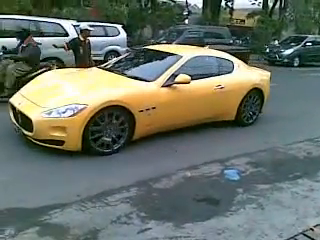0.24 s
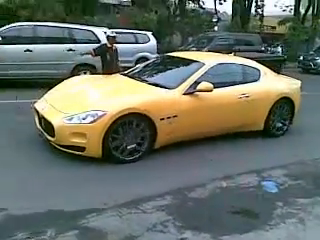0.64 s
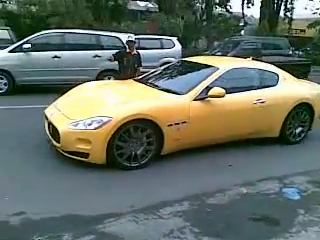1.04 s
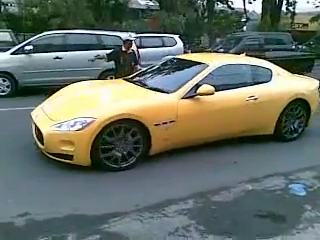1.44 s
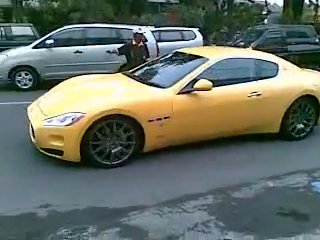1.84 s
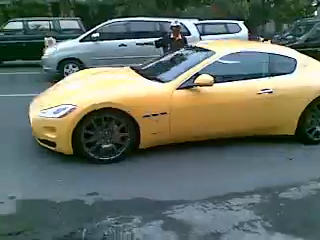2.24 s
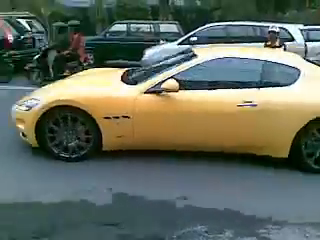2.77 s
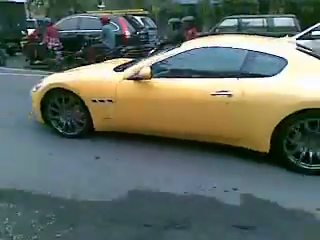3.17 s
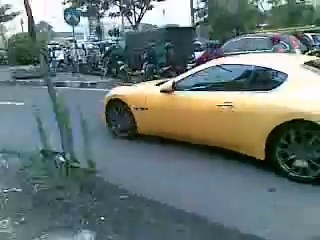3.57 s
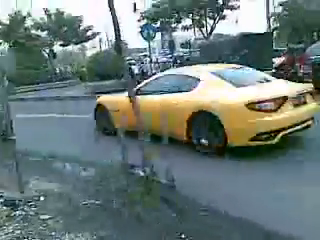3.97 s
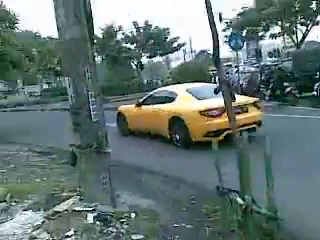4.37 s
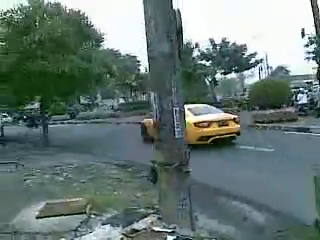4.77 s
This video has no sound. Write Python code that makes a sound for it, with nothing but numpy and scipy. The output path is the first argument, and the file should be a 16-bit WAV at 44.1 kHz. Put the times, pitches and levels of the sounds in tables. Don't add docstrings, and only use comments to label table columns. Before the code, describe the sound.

A city street heard from the kerb through a small camera microphone with thin, flickering treble. For the first two seconds, a soft low wash of traffic covers the faint, lumpy idle of an eight-cylinder car. A distant toot fades by 0.2 s, a tiny tick comes near 0.4 s, and a short rising toot at about 0.8 s. At 1.36 s a nearby two-tone horn gives one very brief, buzzing beep with a slight echo. Two short low hums follow around 2.1 s. From about 2.2 s the engine surges, its burble growing into bark and rasp, with soft tyre swishes over grit until about 3 s. Pitch climbs quickly, nearly levels around 3.3-3.8 s, then climbs again. Near 4.1 s the rasp swells with a sharp gritty swish as the tailpipes turn into view. The rear exhaust roars on, hissier after 4.7 s, still rising at the 5-second cut, echoed by house fronts.

```python
import sys
import numpy as np
from scipy import signal
from scipy.io import wavfile
from scipy.ndimage import uniform_filter1d

SR = 44100
rng = np.random.default_rng(int(sys.argv[2]) if len(sys.argv) > 2 else 0)


def gain_from_decibels(decibels):
    exponent = np.asarray(decibels, float) / 20
    return 10 ** exponent


def materialize(psi):
    bounded = np.clip(np.atleast_2d(psi).T, -1, 1)
    quanta = np.round(bounded * 32767).astype(np.int16)
    wavfile.write(sys.argv[1], SR, quanta)


N = 221861

# (time [s], firing rate [1/s])
SPEED = [(0, 55.6), (1.2, 56), (1.9, 55), (2, 66), (2.3, 104.8), (2.4, 110.5), (2.64, 134), (2.88, 167.2),
         (3.03, 176.6), (3.19, 189.4), (3.39, 196), (3.82, 198.2), (4.04, 213), (4.14, 225.9), (4.3, 246.8),
         (4.55, 277.3), (4.75, 313), (5.03, 356)]
# (time [s], level [dB])
EFFORT = [(0, -63), (.9, -66.5), (1.9, -68.5), (2.33, -50), (2.5, -40.5), (2.76, -42), (2.87, -33.5),
          (3, -34.5), (3.2, -32), (3.62, -29), (3.7, -33.5), (3.9, -32), (4.06, -28), (4.42, -28),
          (4.58, -28.5), (4.64, -28), (4.98, -24.5), (5.03, -25.5)]
# (time [s], share of rear view [0-1], roughness [0-1])
TURN = [
    (1.8, .02, .3),
    (2.3, .02, .2),
    (2.75, .02, .17),
    (3, .02, .12),
    (4.05, .1, .1),
    (4.4, .85, .13),
    (4.7, .98, .11),
    (5.03, .98, .13),
]
# (time [s], lateness [firing gaps])
FIRING_LAG = [(2.3, .25), (2.54, .72), (2.8, .2), (3.15, 0), (3.3, -.2), (3.45, -.2), (3.62, .05),
              (3.9, .2), (4.2, .25), (4.46, .5), (4.7, .4), (5.03, .3)]


def car():
    hz, effort_db, behind = curves(SPEED)[0], curves(EFFORT)[0], curves(TURN)[0]
    idle_db, full_db = -66, -41
    gas_db = np.clip(effort_db, idle_db, full_db) - full_db
    turns = np.cumsum(hz) / SR - curves(FIRING_LAG)[0]
    fire = firings(turns, behind)
    tones = low_tones(hz, gas_db, turns, fire)
    pipes = exhaust(effort_db, gas_db, behind, fire)
    return gain_from_decibels(3.5) * tones + hollowed(pipes) + gain_from_decibels(0.5) * gas_hiss(hz, behind, fire)


# (strength [dB], lateness [firing gaps])
SIDE_FIRINGS = [(.1, .024), (-5, .012), (-.3, .006), (3.2, .004), (3.2, .014), (-2.7, -.012), (.3, -.037),
                (1.6, -.011)]
# (strength [dB], lateness [firing gaps])
REAR_FIRINGS = [(1.6, -.061), (-.2, .226), (-1.6, -.126), (1, -.028), (2.6, -.067), (-.6, .214),
                (-.6, -.126), (.2, -.03)]
# (time [s], levels of the eight firings [dB])
CRACKS = [(2.45, [-12, 0, -14, -9, -14, 0, -14, -9]), (2.6, [-14, 0, -14, -10, -14, 0, -14, -10]),
          (2.72, [-2, -3, -5, -3, -1, 0, -1, 0]), (2.95, [-4, -9, -6, -2, -5, -9, -2, 0]),
          (3.4, [-5, -10, -7, -10, -10, -12, -2, 0]), (3.7, [-3, -7, -4, -10, -5, -10, -1, 0]),
          (3.97, [-2, -7, -7, -9, 0, -5, -2, -5]), (4.13, [-8, -12, -12, -10, -8, -6, -12, 0]),
          (4.35, [-9, -12, -12, -7, -10, -12, -12, 0]), (4.6, [-6, -9, -9, -2, -6, -9, -8, 0]),
          (4.9, [-1, -4, -5, 0, -3, -6, -6, -1])]


def firings(turns, behind):
    firing = np.arange(1, int(turns[-1]))
    beat = np.interp(firing, turns, np.arange(N))
    pattern_lag_s = .2
    rear = behind[np.maximum(beat - pattern_lag_s * SR, 0).astype(int)]
    rough = curves(TURN)[1][beat.astype(int)]
    side_view = np.array(SIDE_FIRINGS)[(firing - 3) % 8].T
    rear_view = np.array(REAR_FIRINGS)[(firing - 3) % 8].T
    strength_db, late = (1 - rear) * side_view + rear * rear_view
    spread, shake = rng.standard_normal((2000, 2))[:len(firing)].T
    spread_db = 8 * rough * spread
    wander = .03 * (1 - rear) * evened(uniform_filter1d(shake, size=10))
    at = np.interp(firing + late + .08 * rough * shake + wander, turns, np.arange(N))
    crack_s = [s for s, _ in CRACKS]
    by_cylinder = np.transpose([levels_db for _, levels_db in CRACKS])
    crack_db = np.array([np.interp(beat / SR, crack_s, levels_db) for levels_db in by_cylinder])
    return {"beat": beat, "at": at, "spread_db": spread_db, "shake": shake,
            "lumps_db": 3 * rough * uniform_filter1d(spread, size=2),
            "strength": gain_from_decibels(strength_db + spread_db), "crack_db": crack_db[firing % 8, firing - 1]}


# (time [s], lean of second harmonic over firing tone [dB], lope [0-1], boom [dB])
TONE_BALANCE = [(0, -0.3, 0.2, 1), (.9, -0.2, 0.1, 3), (1.2, -2.5, 0.05, -1), (1.9, -0.3, 0.05, 1),
                (2.2, 0.5, 0.44, 2.5), (2.36, -2, 0.17, -0.6), (2.44, -1.2, 0, -1.5), (2.55, 3.5, 0.17, -2),
                (2.72, 1, 0.4, 0), (2.85, 3, 0.12, 1.5), (3.02, 3.5, 0, 0.7), (3.3, 1, 0, 0.6), (3.6, 1.5, 0, 0.5),
                (3.9, -2, 0, 1), (4.1, -0.7, .03, -0.1), (4.5, 1.2, 0, 1.5), (4.7, 2.2, 0.02, 0),
                (5.03, -0.3, 0.06, -0.2)]


def low_tones(hz, gas_db, turns, fire):
    tones = np.zeros(N)
    for k, gain in zip((1, 2, 3, 1 / 4), low_levels(hz, gas_db)):
        fade = np.clip((500 - k * hz) / 80, 0, 1)
        tones += gain * fade * np.cos(k * (2 * np.pi * turns + 1))
    tones *= gain_from_decibels(np.interp(np.arange(N), fire["beat"], fire["lumps_db"]))
    lope = np.cos(np.pi * turns / 2 + 1) + np.cos(np.pi * turns)
    return tones * (1 + curves(TONE_BALANCE)[1] * lope)


ORDER_DB = [3, -2, -4]


def low_levels(hz, gas_db):
    t = np.arange(N) / SR
    lean_db, _, boom_db = curves(TONE_BALANCE)
    stumble_db = -13 * np.exp(-((t - 3.225) / 0.033) ** 2)
    shared_db = 0.64 * gas_db + boom_db + stumble_db
    crank = gain_from_decibels(shared_db - 66.5 + 23 * curves(TURN)[0] ** 2)
    levels = [low_pipe(k * hz) * gain_from_decibels(db + shared_db + lean * lean_db)
              for k, db, lean in zip((1, 2, 3), ORDER_DB, (-1, 1, 0))]
    return levels + [crank]


# (pitch [Hz], width [Hz], level [dB])
LOW_PIPE = [(58, 19, -31.5), (106.6, 24, -31.5), (179, 12, -28), (222, 78, -29.5), (258.6, 58, -31),
            (310, 55, -33), (331.2, 33, -30.5), (384, 73, -39), (473, 84, -41)]


def low_pipe(hz):
    return np.sqrt(sum(gain_from_decibels(2 * db) / (1 + (2 * (hz - at_hz) / width_hz) ** 2) ** 2
                       for at_hz, width_hz, db in LOW_PIPE))


# (frequency [Hz], level [dB])
BURBLE = [(25, -22), (50, -32), (75, -17.5), (120, -31.5), (200, 7.5), (330, 5), (410, -6), (470, -20),
          (700, -64.5), (3000, -107)]
BURBLE_REAR = [(25, -26), (70, -5.5), (120, -6.5), (200, -9.5), (330, 2), (410, -2.5), (470, -14.5),
               (700, -64), (3000, -107)]
BARK = [(200, -45.5), (360, -22.5), (460, 5.5), (580, 4.5), (680, 7.5), (790, 8.5), (900, -0.5), (1100, 5),
        (1300, -17.5), (4000, -99)]
BARK_REAR = [(200, -29.5), (340, -3.5), (440, -3.5), (600, 5.5), (720, -0.5), (850, 2), (1000, -7),
             (1300, -4), (4000, -104)]
RASP = [(500, -38), (950, -18), (1150, 17), (1450, 14), (1750, 9.5), (2050, 6.5), (2350, -30),
        (2800, -30.5), (3600, -36.5), (6000, -28.5), (9000, -82)]
RASP_REAR = [(500, -75.5), (950, -8), (1150, -14), (1450, 7), (1900, 10), (2200, 1.5), (2600, -12),
             (3400, -13), (6000, -64), (9000, -107.5)]


def exhaust(effort_db, gas_db, behind, fire):
    pulses = train(fire["at"], fire["strength"])
    uneven = pulses - train(fire["beat"], uniform_filter1d(fire["strength"], size=8))
    puff = coloured(pulses, [(20, 0), (150, -1.5), (600, -20), (5000, -60)])
    gusts = steadied(puff * rng.standard_normal(N))
    cracks = train(fire["at"], gain_from_decibels(fire["crack_db"] + fire["spread_db"]))
    bark = pipe((.24 + .06 * behind) * gusts - steadied(pulses), BARK, BARK_REAR)
    rasp = pipe((.45 - .12 * behind) * gusts - steadied(cracks), RASP, RASP_REAR)
    burble = pipe(-uneven, BURBLE, BURBLE_REAR)
    since = np.arange(N) / SR - 4.09
    swell = np.exp(np.minimum(since / .15, -since / .02))
    rasp_db = -37 + 0.85 * (effort_db + 29) + 5.5 * swell
    burble_db = -32.5 + 0.95 * gas_db - 2 * behind
    return gain_from_decibels(effort_db) * bark + gain_from_decibels(rasp_db) * rasp + gain_from_decibels(burble_db) * burble


def pipe(drive, side, rear):
    share = curves(TURN)[0]
    return steadied((1 - share) * evened(coloured(drive, side)) + share * evened(coloured(drive, rear)))


# (frequency [Hz], level [dB per Hz])
HISS_COLOUR = [(2000, -12), (2600, -6), (3400, -7.5), (4200, -10.5), (5500, -14), (6500, -19),
               (7500, -47.5), (9000, -57.5), (12000, -100)]
FIZZ_COLOUR = [(6500, -44), (7800, -11), (8600, -10), (9400, -8.5), (9900, -22), (10500, -15), (12000, -13),
               (14000, -19.5)]
# (frequency [Hz], level [dB])
CHATTER = [(1500, -68), (2800, -36.5), (3900, 11), (5000, -14.5), (6500, -35.5), (9000, -63)]
CHATTER_REAR = [(1500, -40), (2600, -12), (3500, 5), (3900, -1), (4400, -7), (5000, -6), (6200, -24),
                (9000, -50)]


def gas_hiss(hz, behind, fire):
    hiss_gain, fizz_gain = hiss_levels(hz)
    hard = train(fire["at"], gain_from_decibels(2 * fire["crack_db"]))
    ticks = steadied(coloured(hard, [(20, 0), (200, -3), (900, -22), (3000, -70)]))
    clicks = train(fire["at"] + .001 * SR, gain_from_decibels(1.7 * fire["crack_db"] + 2.5 * fire["shake"]))
    chatter = pipe(clicks, CHATTER, CHATTER_REAR)
    hiss = noise(HISS_COLOUR, patchy_db=1.2) * (1 + .3 * ticks) + (.7 + .6 * behind) * chatter
    fizz = noise(FIZZ_COLOUR, patchy_db=5.0) * (1 + 0.43 * ticks)
    return hiss_gain * hiss + fizz_gain * fizz


def hiss_levels(hz):
    t = np.arange(N) / SR
    flap_db = 6.5 * np.clip((t - 4.66) / 0.012 + .5, 0, 1)
    gas = gain_from_decibels(-63.5 + 9 * np.log2(hz / 200) + curves(TURN)[0] + flap_db)
    near = np.clip(t - 1.7, 0, 1) / np.hypot(1, (t - 3.11) / 0.28)
    return np.hypot(gas, gain_from_decibels(-75) * near), np.hypot(gain_from_decibels(-12) * gas, gain_from_decibels(-67.5) * near)


# (time [s], centre [Hz], share taken out [0-1])
HOLLOW_HIGH = [(2.2, 1100, 1), (2.55, 1100, 0.6), (2.7, 1100, 0.1), (4.085, 1250, 0.16), (4.1, 1220, 1),
               (4.22, 1030, 0.45), (4.35, 950, 0.72), (4.5, 1030, .6), (4.65, 1090, 0.77),
               (4.72, 1380, 0.26), (4.85, 1450, 0.38), (5.03, 1580, 0.74)]
HOLLOW_LOW = [(2.6, 700, 0), (2.7, 740, 0.54), (2.9, 840, .6), (2.97, 780, .1), (3.02, 710, .5),
              (3.12, 740, .4), (3.18, 740, 0), (4.1, 336, .02), (4.2, 340, 0.28), (4.35, 396, 0.4),
              (4.5, 436, 0.82), (4.6, 497, .03), (4.72, 636, .03), (4.8, 657, 1), (4.95, 770, 0.37),
              (5.03, 805, 0.35)]
# (time [s], centre [Hz], share taken out, negative adds)
RIDGE = [(2.4, 680, 0), (2.5, 690, -0.92), (2.6, 646, -0.61), (2.75, 600, -0.36), (2.88, 655, -.6),
         (3, 660, 0.057), (4.05, 620, -.05), (4.2, 684, -0.27), (4.33, 740, -0.065), (4.45, 796, -0.79),
         (4.58, 790, -1), (4.62, 670, 0.19), (4.68, 666, -1.3), (4.76, 720, -0.37), (4.81, 820, -0.27),
         (4.88, 850, -1.2), (4.92, 645, -.2), (5.03, 668, -1)]
HOLLOW_WIDTH_HZ = 237, 45, 45


def hollowed(x):
    for rows, width_hz in zip((HOLLOW_HIGH, HOLLOW_LOW, RIDGE), HOLLOW_WIDTH_HZ):
        x = without(x, *curves(rows), width_hz)
    for hz in np.outer((1, 2), curves(SPEED)[0]):
        x = without(x, hz, np.clip((450 - hz) / 80, 0, 1), 12)
    return x


HORN_LOW = 417.3, [-42, -37, -40, -34, -33, -47, -44, -60, -62, -65, -68, -70, -62, -64, -64, -70, -71, -71,
            -73, -69, -72]
HORN_HIGH = 511.4, [-47, -35, -48, -28, -56, -58, -70, -63]
# (pitch [Hz], level [dB])
HORN_MIXED = [(281, -51), (1480, -53), (1763, -49), (1916, -52), (1996, -43), (2140, -50), (2270, -57),
              (2692, -58)]
# (frequency [Hz], time constant [s])
HORN_RING = [(400, .014), (840, .011), (1020, .024), (1250, .03), (1670, .014), (2050, .014), (3000, .006)]
# (frequency [Hz], level [dB])
HORN_TAIL = [(830, -30), (1020, -11), (1250, -12), (1670, -24), (2050, -26), (3000, -40)]


def horn():
    on_s, off_s = 1.36, 1.423
    out = np.zeros(N)
    span = slice(round(on_s * SR), round((off_s + .3) * SR))
    t = (np.arange(N) / SR - on_s)[span]
    partials = [(k * hz, db) for hz, levels_db in (HORN_LOW, HORN_HIGH) for k, db in enumerate(levels_db, 1)]
    after = np.maximum(t - off_s + on_s, 0)
    rattle = noise([(300, -12), (700, -14), (1400, 2), (2100, 0), (2700, -10.0), (3400, -23),
                    (4100, -16.5), (5000, -20.0), (9000, -27.5)], patchy_db=9.0)[span]
    out[span] = gain_from_decibels(-43) * np.clip(t / 0.021, 0, 1) * np.exp(-after / 0.023) * rattle
    for hz, db in partials + HORN_MIXED:
        rise = np.clip(t / (.012 + .005 * (hz / 3000) ** 2), 0, 1) ** 2
        ring = np.exp(-after / read(HORN_RING, hz))
        tail = gain_from_decibels(read(HORN_TAIL, hz)) * np.exp(-after / .07)
        wave = np.cos(2 * np.pi * (hz * t + rng.random()))
        out[span] += gain_from_decibels(db) * rise * np.maximum(ring, tail) * wave
    return np.sqrt(2) * out


# (time [s], level [dB], length [s])
SWISHES = [
    (2.354, -56, 0.067),
    (2.503, -57, 0.054),
    (2.626, -51.5, 0.062),
    (2.743, -54, 0.16),
    (2.898, -53, 0.07),
    (4.129, -48.5, 0.045),
    (0.361, -49.5, 0.0085),
]


def tyres():
    t = np.arange(N) / SR
    shape = np.zeros(N)
    for s, db, length_s in SWISHES:
        start = np.clip((t - s) / 0.0032, 0, 1)
        shape += gain_from_decibels(db) * start * np.exp(-(np.maximum(t - s, 0) / length_s) ** 3)
    return shape * noise([(2000, -4.5), (3000, -12.5), (4500, -7.5), (6500, -16), (9500, -16.0),
                          (11000, -27.0), (14000, -64.0)], patchy_db=3.5)


# (start [s], end [s], first pitch [Hz], last pitch
# [Hz], level [dB])
GLIDING_TONES = [
    (0, 0.223, 596, 605, -52.5),
    (.755, 0.804, 465, 500, -48.5),
    (2.066, 2.138, 292, 320, -35),
    (2.154, 2.202, 260, 267, -31.5),
]


def gliding_tones():
    out = np.zeros(N)
    for start, end, from_hz, to_hz, db in GLIDING_TONES:
        first = max(round(start * SR), 0)
        hz = np.linspace(from_hz, to_hz, round(end * SR) - first)
        tone = np.sin(2 * np.pi * np.cumsum(hz) / SR) * np.hanning(len(hz)) ** 0.17
        out[first:first + len(hz)] += gain_from_decibels(db) * tone
    return out


# (frequency [Hz], level [dB per Hz])
STREET = [(12, -42.5), (22, -25.5), (63, -6), (170, -11.5), (350, -22), (450, -27.5), (1150, -29.5),
          (1950, -26.5), (2900, -41.5), (4200, -42), (7000, -49.5), (9300, -53.5), (10500, -56.5),
          (14000, -78.5)]
# (time [s], level [dB])
STREET_LEVEL = [(0, -44.5), (.7, -42), (1.2, -40.5), (1.6, -42.5), (2.1, -43.5), (3, -40), (3.6, -42),
                (4.1, -42.5), (4.6, -40), (5.03, -45.5)]


def traffic():
    return gain_from_decibels(curves(STREET_LEVEL)[0]) * noise(STREET, patchy_db=1.2)


# (frequency [Hz], time to fall 60 dB [s])
WALLS = [(300, .4), (1100, .75), (1400, .65), (2000, .27), (4000, .2), (9000, .12)]


def walls(x):
    taps = np.zeros(SR // 2)
    at = np.arange(500, len(taps) - 20, 20)
    taps[at + rng.integers(0, 20, len(at))] = rng.choice([-1., 1.], len(at))
    hz, t, z = signal.stft(taps, SR, nperseg=256)
    tail = signal.istft(z * gain_from_decibels(-60 * t / read(WALLS, hz)[:, None]), SR, nperseg=256)[1]
    return signal.oaconvolve(x, tail / np.linalg.norm(tail))[:N]


def evened(x):
    return x / np.sqrt(np.mean(x ** 2) + 1e-20)


def steadied(x, size=6000):
    return x / np.sqrt(abs(uniform_filter1d(x ** 2, size)) + 1e-12)


def read(points, hz):
    f, value = np.transpose(points)
    return np.interp(np.log(hz + 1), np.log(f + 1), value)


def curves(rows):
    s, *columns = np.transpose(rows)
    return [np.interp(np.arange(N) / SR, s, c) for c in columns]


def coloured(x, points, size=4096):
    log_gain = np.log(gain_from_decibels(read(points, abs(np.fft.fftfreq(size, 1 / SR)))))
    taps = np.fft.ifft(np.exp(np.conj(signal.hilbert(log_gain)))).real
    return signal.oaconvolve(x, taps)[:N]


def noise(points, patchy_db):
    hz = np.fft.rfftfreq(1024, 1 / SR)
    a, b, patches = rng.standard_normal((N // 256 + 5, 513, 3)).T
    patches = evened(uniform_filter1d(uniform_filter1d(patches, size=12, axis=0), size=14, axis=1))
    z = (a + 1j * b) * gain_from_decibels(read(points, hz)[:, None] + patchy_db * patches)
    return evened(signal.istft(z, nperseg=1024, noverlap=768)[1][:N])


def train(at, sizes):
    whole = np.maximum(at, 0).astype(int)
    part = at - whole
    return np.bincount(np.r_[whole, whole + 1], np.r_[sizes * (1 - part), sizes * part], N)[:N]


def without(x, hz, share, width_hz):
    turn = np.exp(2j * np.pi * np.cumsum(hz) / SR)
    band = signal.sosfiltfilt(signal.butter(1, width_hz, fs=SR, output="sos"), x / turn)
    return x - np.clip(share, -2, 1) * 2 * (band * turn).real


def scene():
    engine, beep = car(), horn()
    slap = gain_from_decibels(-27) * np.roll(beep, round(.15 * SR))
    echoes = walls(gain_from_decibels(-16) * engine + gain_from_decibels(-24) * beep) + slap
    return (engine + beep + echoes + tyres() + gliding_tones() + traffic())[None]


# (frequency [Hz], level [dB])
GATE = [(5200, -115), (6400, -96), (7500, -92), (8500, -93), (9500, -94), (10000, -92), (11500, -88),
        (12500, -83), (14000, -83)]
# (frequency [Hz], level over their rms [dB])
GATE_LOCAL = [(5200, -8), (6300, 1), (6900, 11), (8100, 10), (8700, 5), (9500, 5), (10000, 12), (14000, 14)]


def thinned(x):
    frame, offset, edge_hz = 1150, 720, 13900
    n = np.arange(2 * frame)
    k = np.arange(round(GATE[0][0] / SR * 2 * frame), round(edge_hz / SR * 2 * frame))
    window = np.sqrt(2 / frame) * np.sin(np.pi * (n + .5) / (2 * frame))
    basis = window[:, None] * np.cos(np.pi / frame * np.outer(n + .5 + frame / 2, k + .5))
    hz = k * SR / (2 * frame)
    where = frame * np.arange(N // frame + 3)[:, None] + n
    frames = np.pad(x, (2 * frame - offset, 4 * frame))[where]
    bins = frames @ basis
    loud_db = 10 * np.log10(np.mean(frames ** 2, axis=1, keepdims=True) + 1e-12) + 24
    near = np.sqrt(abs(uniform_filter1d(bins ** 2, size=32, axis=1)))
    near = near * gain_from_decibels(read(GATE_LOCAL, hz) + .2 * loud_db)
    scatter_db = 2.5 * np.repeat(rng.standard_normal((len(bins), 40)), 20, axis=1)[:, :len(k)]
    floor = gain_from_decibels(read(GATE, hz) + 36 + .8 * loud_db)
    step = gain_from_decibels(scatter_db) * np.maximum(near, floor)
    rounded = np.sign(bins) * np.floor(abs(bins) / step + .4) * step
    change = (rounded - bins) @ basis.T
    return x + np.bincount(where.ravel(), change.ravel())[2 * frame - offset:][:N]


def low_pass(x):
    return signal.sosfilt(signal.butter(12, 13900, fs=SR, output="sos"), x)


def record(dry):
    mix = thinned(dry[0])[None]
    return low_pass(mix)


dry = scene()
out = record(dry)
materialize(out)
```